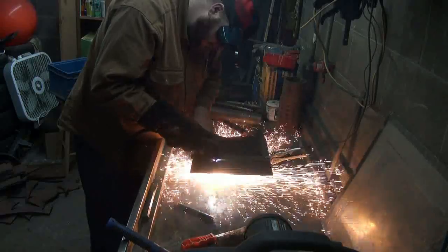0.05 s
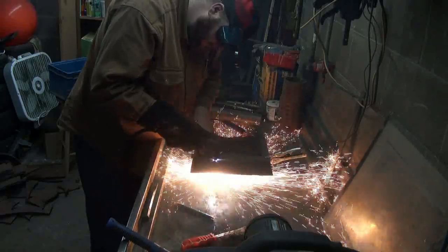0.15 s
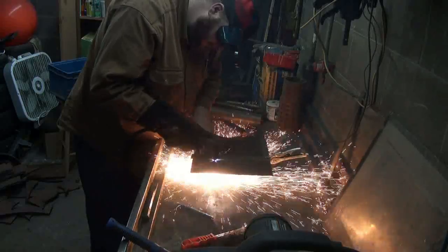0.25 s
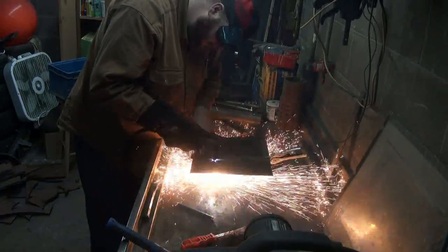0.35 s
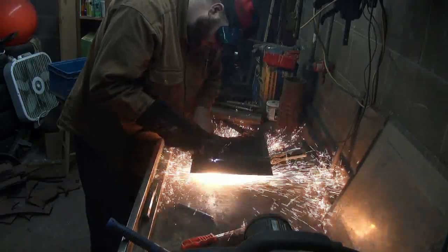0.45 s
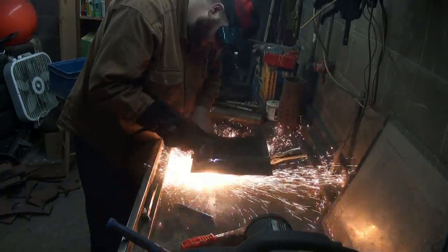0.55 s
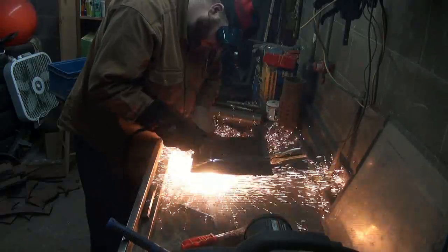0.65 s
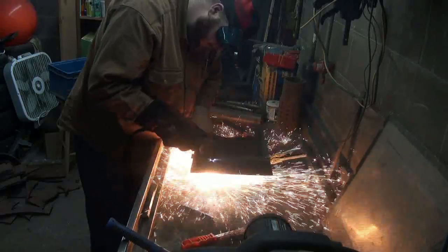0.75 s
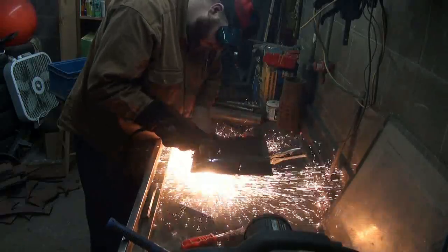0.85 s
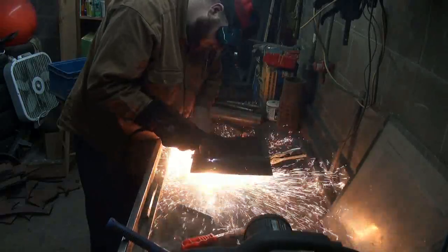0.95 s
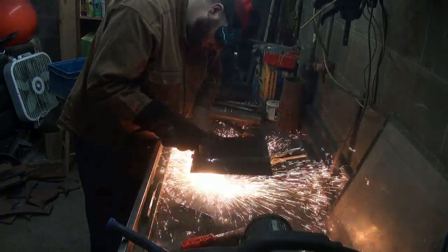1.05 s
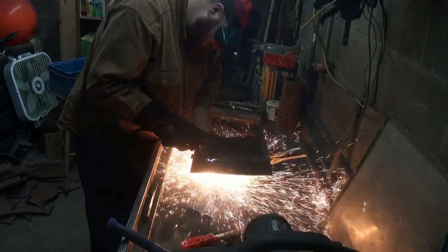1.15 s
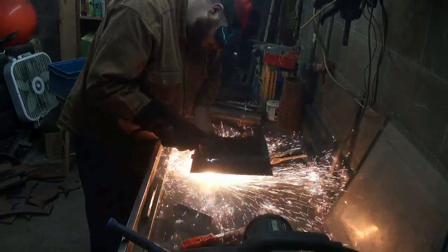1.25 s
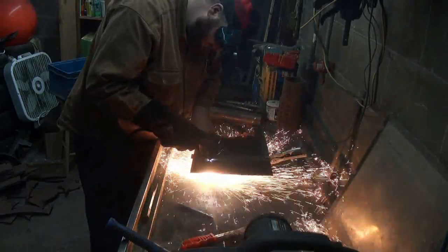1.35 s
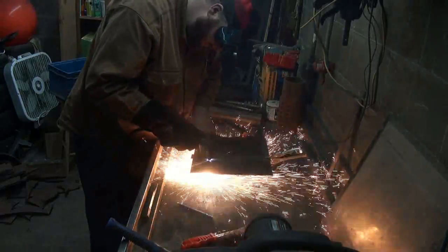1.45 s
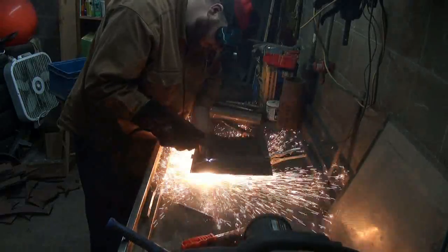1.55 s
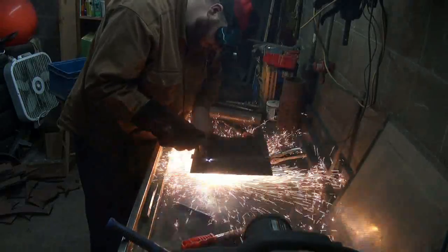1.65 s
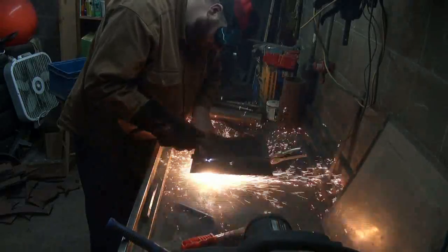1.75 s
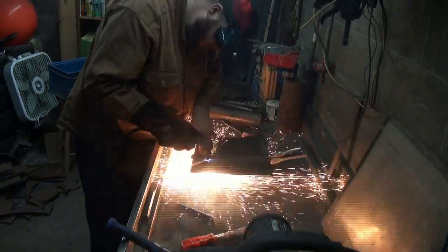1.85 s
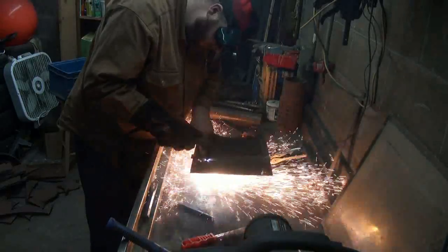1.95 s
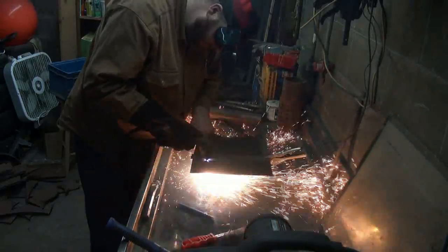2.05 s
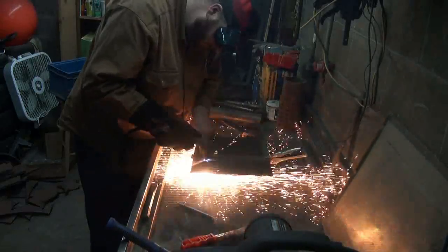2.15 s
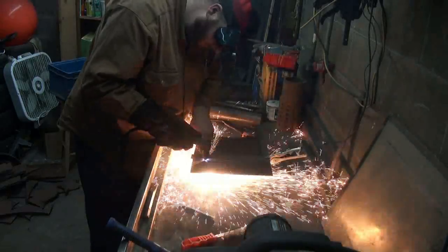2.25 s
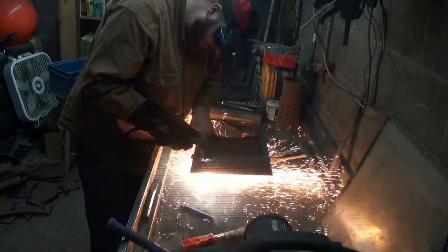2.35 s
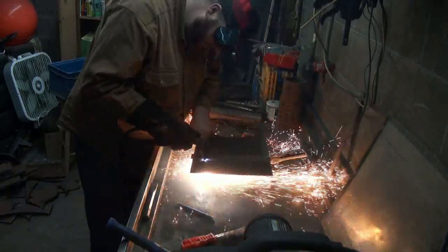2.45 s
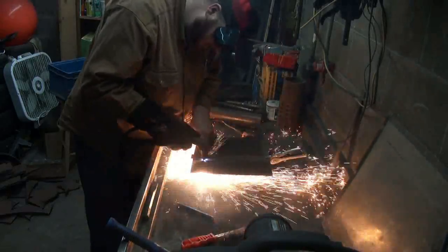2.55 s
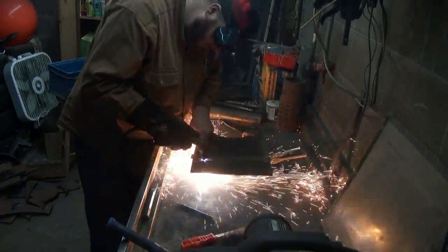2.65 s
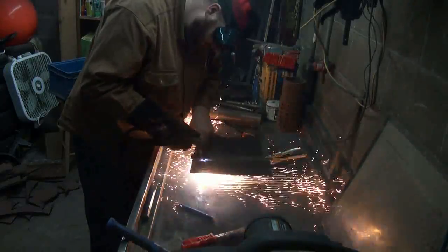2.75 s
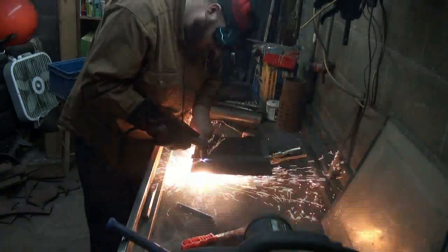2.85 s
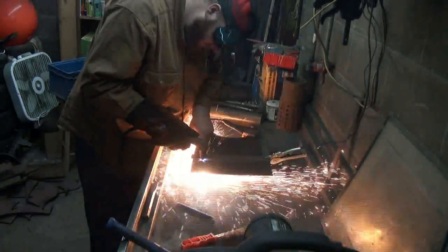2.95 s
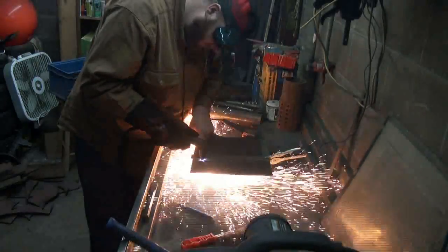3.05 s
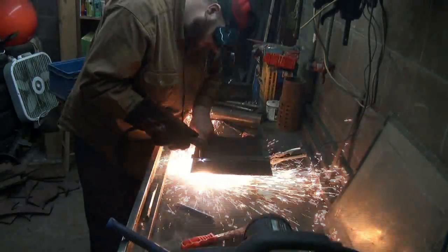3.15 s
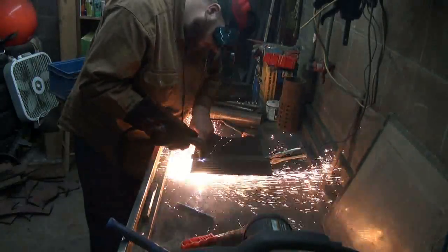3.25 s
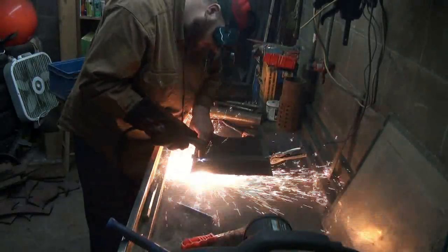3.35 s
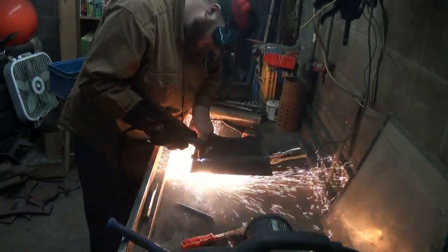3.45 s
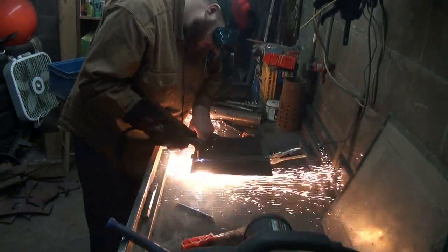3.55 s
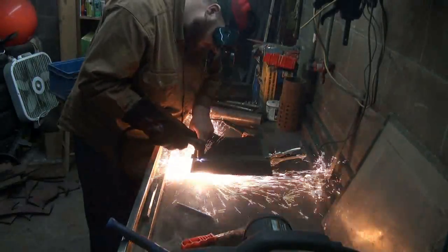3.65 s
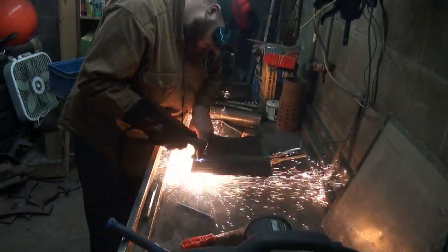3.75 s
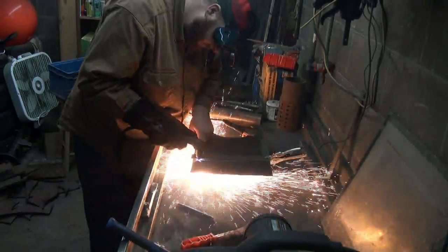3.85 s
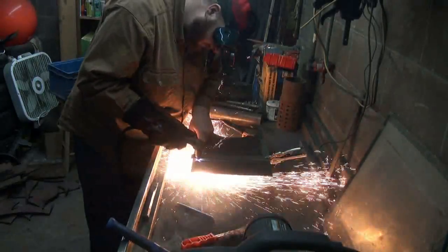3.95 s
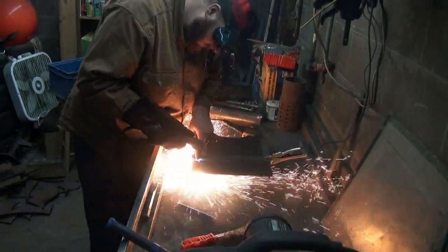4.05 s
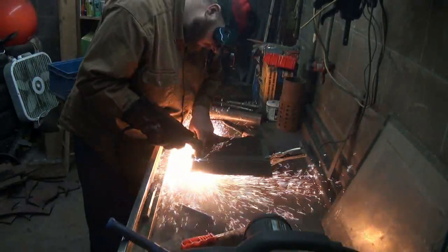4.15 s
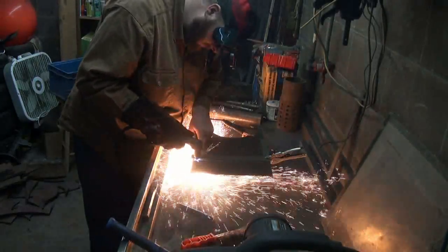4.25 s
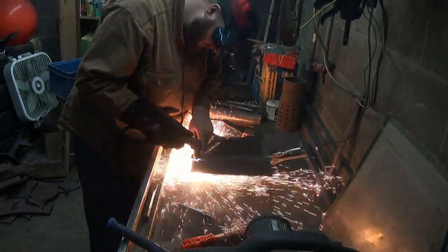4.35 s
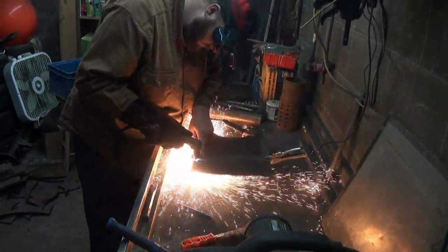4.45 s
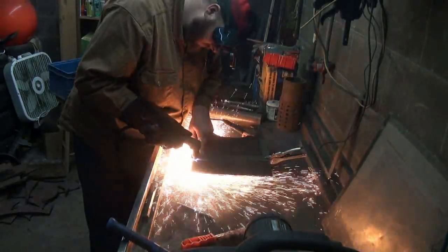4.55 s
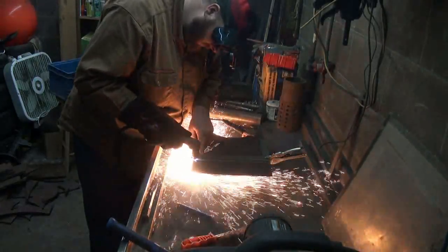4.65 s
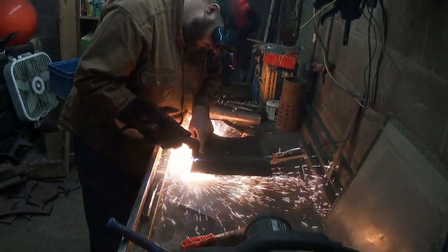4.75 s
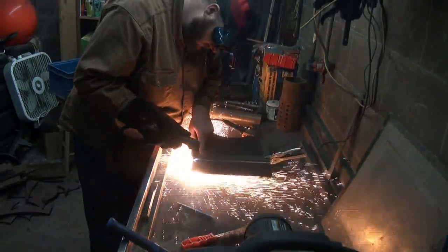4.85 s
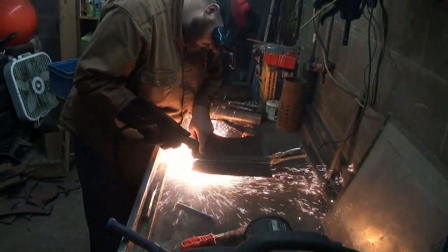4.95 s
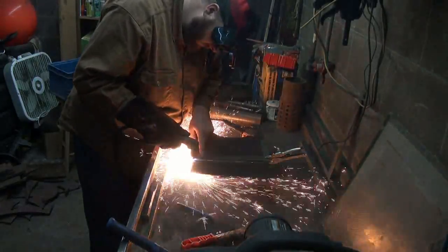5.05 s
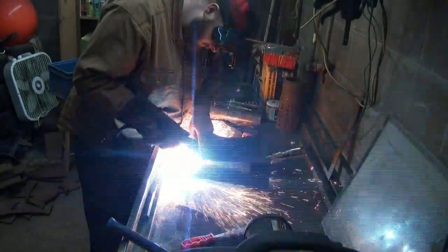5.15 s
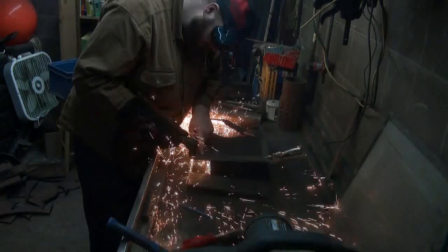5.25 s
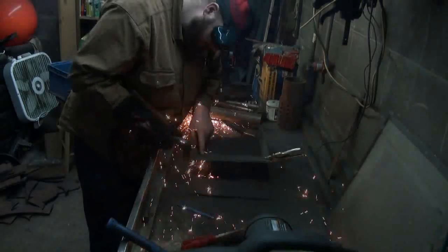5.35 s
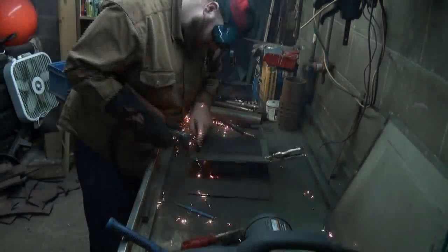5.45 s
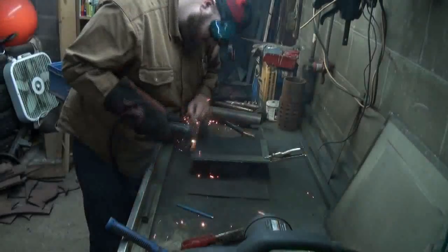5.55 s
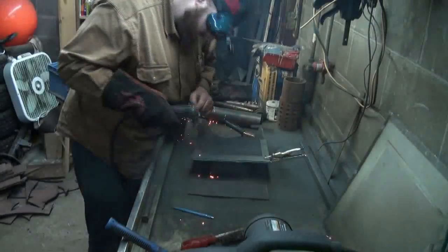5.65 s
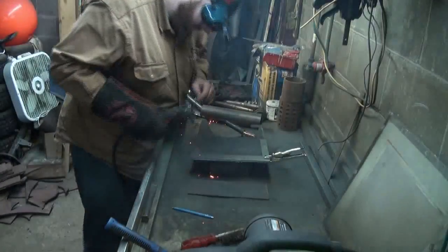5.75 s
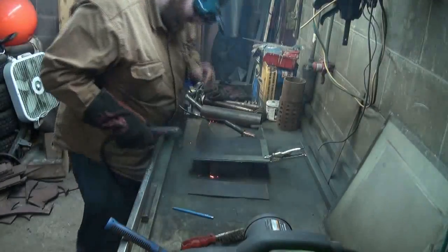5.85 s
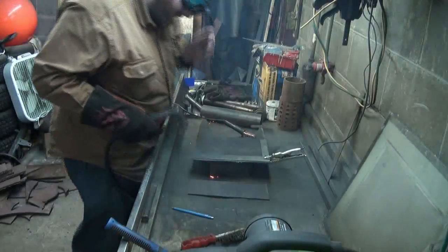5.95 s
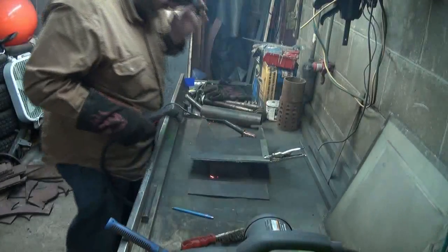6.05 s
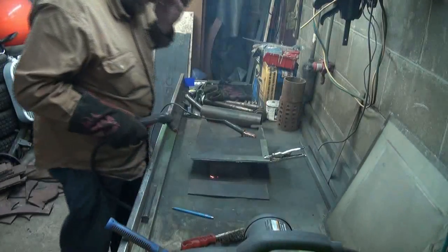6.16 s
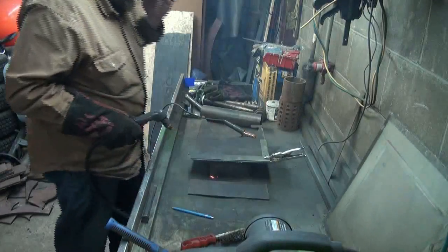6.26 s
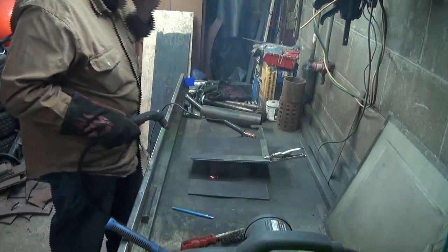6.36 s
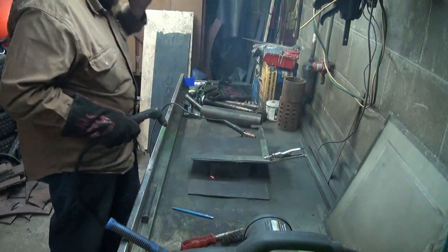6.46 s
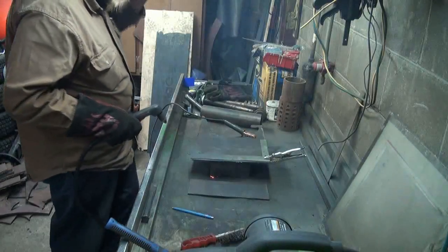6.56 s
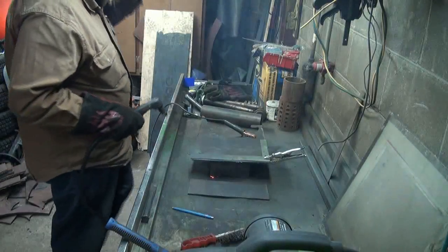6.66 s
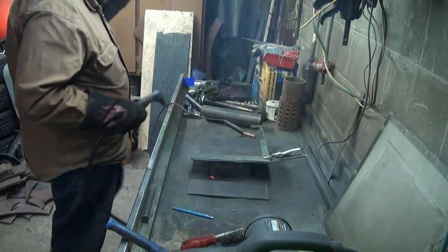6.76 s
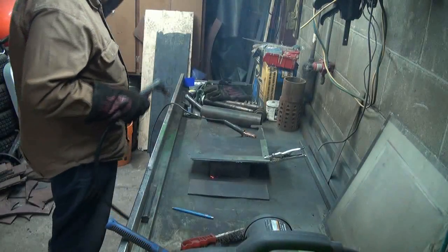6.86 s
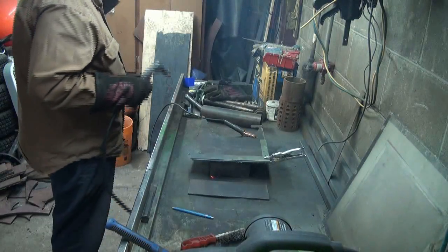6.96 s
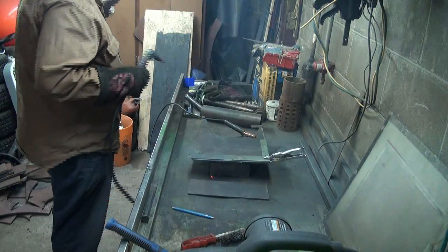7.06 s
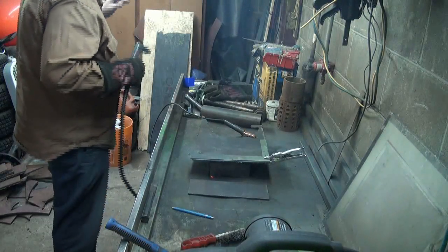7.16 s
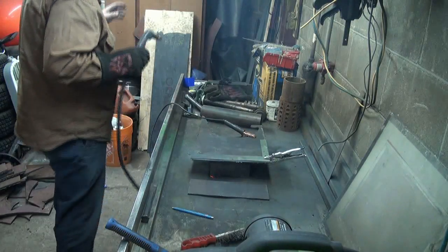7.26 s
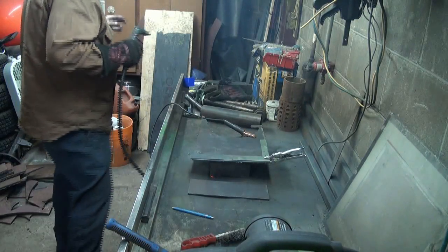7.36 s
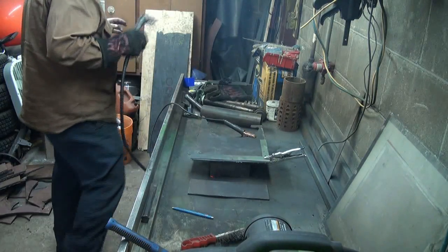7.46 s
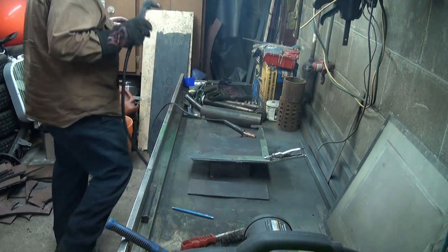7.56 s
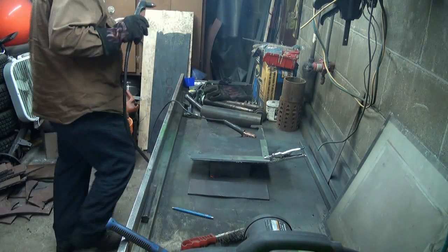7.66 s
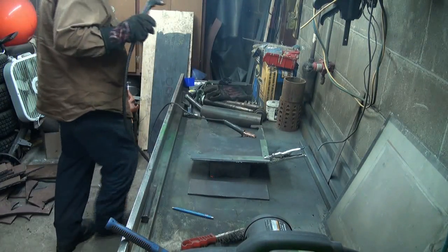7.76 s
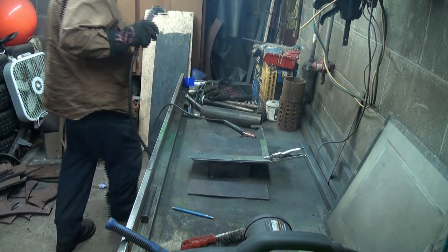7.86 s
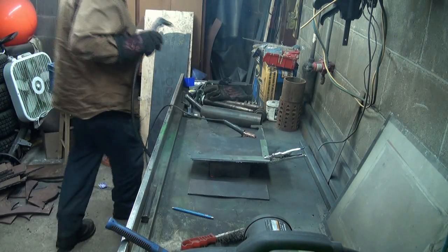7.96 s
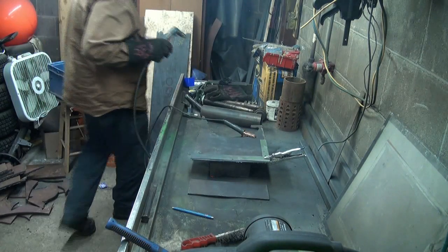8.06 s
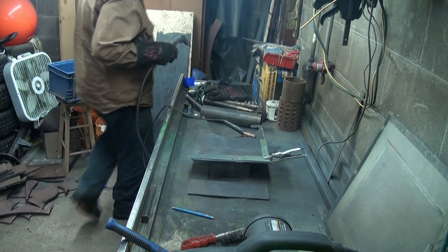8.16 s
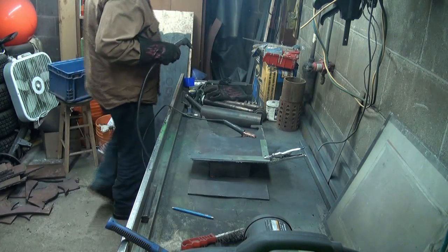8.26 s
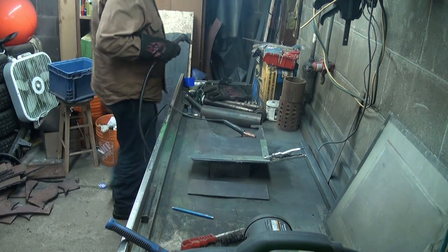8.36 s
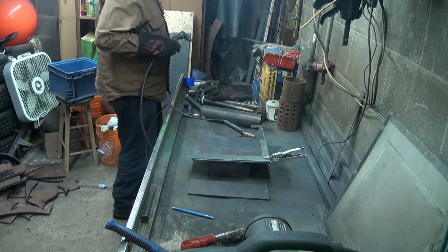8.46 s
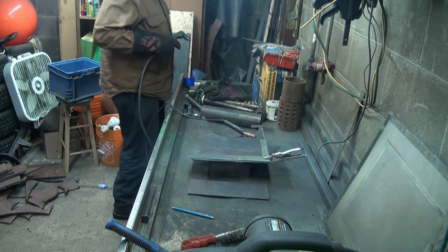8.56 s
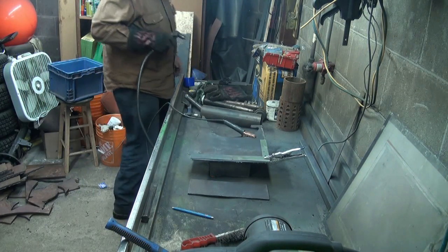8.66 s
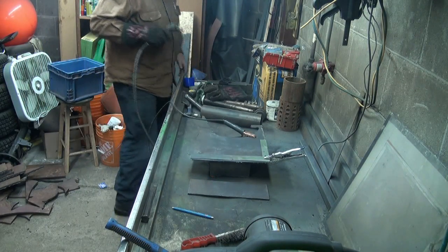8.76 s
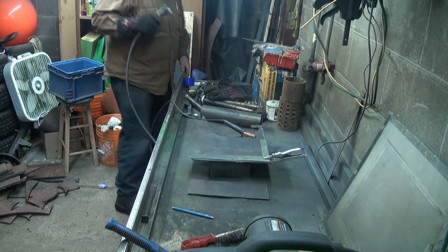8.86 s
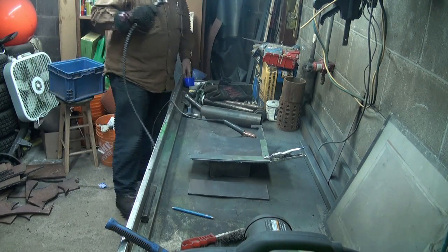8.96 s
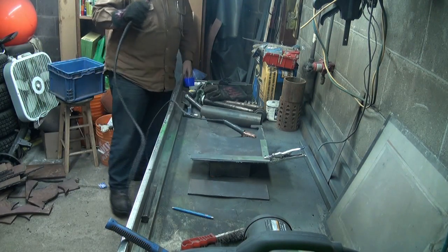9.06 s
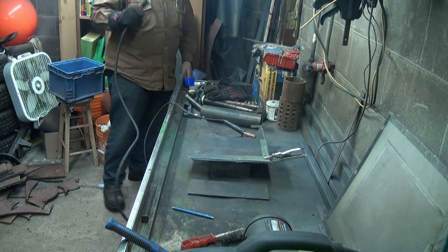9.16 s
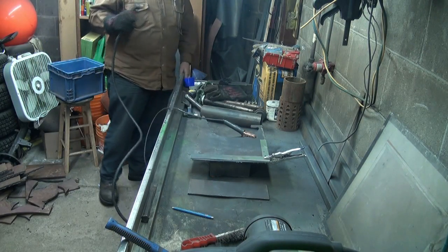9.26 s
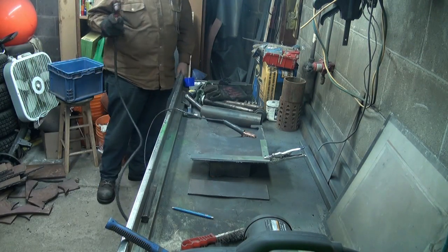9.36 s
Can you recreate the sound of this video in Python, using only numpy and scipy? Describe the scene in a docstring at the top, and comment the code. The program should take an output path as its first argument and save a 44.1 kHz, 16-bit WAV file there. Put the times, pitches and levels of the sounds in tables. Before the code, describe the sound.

Close by in a small workshop, a plasma cutter hisses harshly through steel plate, with flaring roars and brief spits of slag. A little past halfway the cutting stops and the offcut drops, clattering on a sheet-steel bench. Softer air keeps hissing from the nozzle, while a fan motor hums to the right and a loose part ticks faintly and quickly.

```python
"""Plasma cutting in a small workshop

Close to a sheet-steel bench, on a camera's stereo microphone. A hand-held torch's turbulent jet hisses
and roars in the kerf, ringing the steel plate and spitting slag, until the offcut drops and clatters;
cooling air then keeps blowing from the nozzle. Behind, to the right, a motor and its fan hum and a
loose part ticks. The camera's gain control holds the hiss down and slowly lets the room come back up."""
import sys
import numpy as np
from scipy import signal
from scipy.fft import rfft, irfft, next_fast_len
from scipy.io import wavfile
from scipy.ndimage import uniform_filter1d

SR = 44100
rng = np.random.default_rng(int(sys.argv[2]) if len(sys.argv) > 2 else 0)


def put_to_file(sound):
    """Save the sound as 16-bit audio at rate SR, in the file named by the first command-line argument."""
    columns = np.atleast_2d(sound).T  # one column per channel
    safe = np.clip(columns, -1, 1)
    whole_steps = np.round(safe * 32767)
    wavfile.write(sys.argv[1], SR, whole_steps.astype(np.int16))


N = 414540
T = np.arange(N) / SR
FFT_SIZE = next_fast_len(N)
HZ = np.maximum(np.fft.rfftfreq(FFT_SIZE, 1 / SR), 1)
ARC_OUT_S, SHAFT_HZ = 5.372, 28.46


# The hand turns the torch before the microphone: time_s, nozzle_hz, upper_kerf_db, left_minus_right_db
TORCH_AIM = [(0, 10700, -2, -2), (.5, 10200, -9, -1.5), (1, 11100, -9, -2), (1.5, 10600, -1.5, -2.5),
             (2.5, 11200, -2, -1.5), (3.6, 11900, 0, -1.5), (4.4, 11600, 8, -1.5), (5.3, 12100, -4, -1.5),
             (6.2, 12700, -3, -3.5), (7.6, 11600, 5, -1), (8.5, 11900, -9, -1.5), (9.4, 11500, -3, -1)]
# Centres of the jet's roar, spit, hiss and treble bands: centre_hz
JET_BANDS = [700, 2600, 6400, 10000]

def torch(crackle_db=0.73):
    """Turbulent jet noise whose bands and resonances follow the hand; it crackles while the arc cuts."""
    framing = dict(fs=SR, nperseg=1024, noverlap=768)
    hz, t, frames = signal.stft(jet_noise(), **framing)
    hz = np.maximum(hz, 1)[:, None]
    nozzle_hz, upper_kerf_db, pan_db = over_time(TORCH_AIM, t)
    hiss_db, roar_db, spit_db, treble_db = jet_levels(t)
    roar, spit, _, treble = (np.interp(np.log(hz), np.log(JET_BANDS), row) for row in np.eye(4))
    treble = treble * np.interp(hz, [12500, 15500], [1, 0.6])  # less lift at the very top
    db = hiss_db + roar * roar_db + spit * spit_db + treble * treble_db
    db = db + eddies(t, roar, treble)
    ring = resonances(hz, t, nozzle_hz, upper_kerf_db)
    lean_db = pan_db * np.interp(hz, [11200, 11800], [1.2, 0.6])  # the top sits nearer the centre
    frames = frames * undb(db + np.array([lean_db, -lean_db]) / 2) * ring
    jet = undb(3.5) * signal.istft(frames, **framing)[1][:, :N]
    return jet * undb(crackle_db * wander(250) * (T < ARC_OUT_S))


# The jet's spectrum close up: frequency_hz, density_db
JET_SPECTRUM = [(60, -12), (250, -6), (700, 4), (1300, -3), (2300, -4.5), (3000, -2), (5000, -1.5),
                (8300, -1.5), (11300, -2), (13500, -4), (15700, -6.5)]
# Arc, then air alone, at the microphone: frequency_hz, likeness, right_lead_rad, left_minus_right_db
ARC_IMAGE = [(60, 0.9, 0, 0), (250, 0.65, 0, -1), (600, 0.9, .2, 0), (1400, 0.75, 0, -1), (2820, 1, 0, 0),
             (4800, 0.78, 0.15, -0.5), (7000, 0.8, .3, -2), (8400, 0.22, 0.15, -2), (9800, 0.55, -0.54, -2),
             (11600, 0.58, -0.33, -0.5), (12100, 0.92, .3, -1), (15500, 0.87, .2, 0)]
AIR_IMAGE = [(60, .95, 0, 0), (3000, 0.71, 0, 0), (6200, 0.75, .2, 1), (8300, .47, .3, 0.081),
             (11200, 0.42, -.2, 0), (11800, .92, .15, 0), (15500, 1, 0, 0)]

def jet_noise():
    """Gas rushes from the nozzle; its stereo image changes as the arc goes out."""
    arc = placed_noise(JET_SPECTRUM, ARC_IMAGE)
    air = placed_noise(JET_SPECTRUM, AIR_IMAGE)
    return np.where(T < ARC_OUT_S, arc, air)


# The arc in the kerf: time_s, hiss_db, spit_over_hiss_db, treble_over_hiss_db
CUTTING = [(0, -4.5, -6.5, 3), (.55, -6, -6, 5.5), (.85, -4.5, -8, 2.5), (1.2, -6, -6, 7),
           (1.7, -4, -7.5, 4.5), (2.15, -5, -6, 2), (2.8, -4.5, -5, 3.5), (3.3, -5, -6, 4.5),
           (3.7, -5.5, -4.5, 1.5), (4.2, -5, -4.5, 3), (4.5, -5, -4, 4.5), (5.25, -6.5, -7, 2.5),
           (5.36, -6, -5, 0.5)]
# The jet bites and the roar flares, or once sags: peak_s, length_s, lift_db
ROAR_FLARES = [(0.243, 0.31, 9), (.69, 0.085, 5.5), (0.857, 0.098, 3.5), (1.035, .15, 6), (1.417, 0.21, 9),
               (1.655, 0.16, 6), (1.966, 0.16, 10), (2.382, 0.2, 11.5), (2.723, 0.07, 8), (2.83, 0.11, -11),
               (3.017, 0.15, 9.5), (3.362, 0.2, 7), (3.67, 0.32, 5.5), (4.03, 0.12, 6), (4.252, 0.29, 6),
               (4.705, 0.27, 8.5), (5.116, 0.36, 5.5)]
# Cooling air alone, carried about in the hand: time_s, hiss_db
COOLING_AIR = [(5.4, -18), (5.5, -22.5), (5.64, -18), (6.44, -19), (6.8, -22), (7.5, -21.5), (8.3, -22.5),
               (8.84, -23.5), (8.92, -20.5), (9.4, -20)]

def jet_levels(t):
    """Hiss level, then roar, spit and treble against it, in dB: the flaring arc, then air alone."""
    hiss_db, spit_db, treble_db = over_time(CUTTING, t)
    flare_db = sum(db * np.exp(-(2 * (t - s) / length) ** 2) for s, length, db in ROAR_FLARES)
    arc = [hiss_db, -21 + flare_db, spit_db + 0.24 * flare_db, treble_db - 0.11 * flare_db]
    air = [over_time(COOLING_AIR, t)[0], -30, -7.5, 1.5]
    return [np.where(t < ARC_OUT_S, arc_db, air_db) for arc_db, air_db in zip(arc, air)]


def eddies(t, roar, treble):
    """Eddies come and go, in dB: the roar flutters most, the treble breaks into brief whistles."""
    shape = (len(roar), len(t))
    flutter = (0.28 + roar) * patches((1, len(t)), size=(1, 8))
    whistles = (0.38 + 0.43 * treble) * patches(shape, size=(3, 90))
    broad_eddies = 0.4 * patches(shape, size=(30, 8))
    # the fine colour shifts in spurts, more so with molten slag in the cut
    spurts = np.where(t < ARC_OUT_S, 2.2, 1.3) * patches(shape, size=(3, 16))
    return flutter + whistles + broad_eddies + spurts


# Plate and bench modes, strongest as the arc passes their spot: pitch_hz, width_hz, level_db, passed_s
PLATE_MODES = [(1027, 115, 4, 1.5), (1494, 46, 7.5, 2.5), (1770, 184, 5.5, 3.1), (2095, 82, 4, 0.9),
               (2590, 110, 1.5, 1.5), (2864, 160, 2, 3.5), (3300, 59, 6, .3), (3230, 66, -5.5, 3.5),
               (3700, 99, 3, 6), (4080, 210, -4.5, 3.1), (7700, 140, -15, 2)]

def resonances(hz, t, nozzle_hz, upper_kerf_db, passing_s=3.92, kerf_fade_s=0.6):
    """Gain on the jet: the nozzle resonates throughout, plate and kerf only while the arc cuts."""
    modes = sum(undb(db) * resonance(hz, pitch_hz, width_hz) * resonance(t, passed_s, passing_s)
                for pitch_hz, width_hz, db, passed_s in PLATE_MODES)
    plate = modes * undb(0.79 * patches(modes.shape, size=(12, 80)))
    kerf_hz = 6090 - 117 * t  # sinks as the cut lengthens
    lower = 0.89 * resonance(hz, kerf_hz, width=240)
    upper = 0.61 * undb(upper_kerf_db) * resonance(hz, 1.16 * kerf_hz, width=290)
    kerf = (lower + upper) * np.clip((ARC_OUT_S - t) / kerf_fade_s, 0, 1)  # fades near the plate's edge
    nozzle = 0.65 * resonance(hz, nozzle_hz, width=2350)
    return 1 + (t < ARC_OUT_S) * (1.1 * plate + kerf) + nozzle


# Slag blows out of the kerf: start_s, relative_level_db
SLAG_SPITS = [(0.26, -25), (1.986, -15), (2.214, -16.5), (2.375, -14.5), (2.597, -11), (2.869, -16),
              (3.655, -22), (3.924, -18), (5.068, -22)]

def slag():
    """Short puffs of mid-range noise as slag lets go."""
    puffs = sum(undb(db) * (T > s) * decay(np.clip(T - s, 0, 1), t60_s=0.14) for s, db in SLAG_SPITS)
    colour = undb(over_hz([(300, -10), (900, -1), (2000, 0), (5000, -22)]))
    return puffs * at_rms(stereo_noise(colour, likeness=0.83), 4.1)


# The offcut lands and rattles, just right of centre: start_s, level_db, brightness_db
LANDINGS = [(5.317, -5, 2), (5.333, -6, 0), (5.344, -0.5, -12), (5.362, -2.5, -7), (5.387, -6, -4),
            (5.403, -15, -2.5), (5.439, -12, 0), (5.481, 2, -0.5), (5.508, -1, -16), (5.552, -3.5, -11),
            (5.597, -9.5, -11)]
# Modes of the cut piece: pitch_hz, level_db, t60_s
OFFCUT_MODES = [(276, -3, 0.18), (2220, -25, 0.27), (3500, -5, 0.087), (5400, -7, .1), (6200, -7, 0.13),
                (7000, -10, 0.18), (7900, -7, .15)]
# The struck sheet-steel bench: frequency_hz, density_db
BENCH_SPECTRUM = [(40, -36), (95, -2.5), (250, 1), (550, 2), (750, 1), (2000, -3.5), (6000, -7.5),
                  (15000, -20)]

def offcut():
    """Each landing shakes the sheet bench into a burst of noise and rings the cut piece."""
    likeness = over_hz([(120, 0.9), (400, 0.49), (3000, 0.62)])
    crash = at_rms(stereo_noise(undb(over_hz(BENCH_SPECTRUM)), likeness), 0)
    boom = signal.sosfilt(signal.butter(1, 1500, fs=SR, output="sos"), crash)
    clash = crash - boom
    out, t = np.zeros((2, N)), T[:SR // 2]
    for start_s, level_db, brightness_db in LANDINGS:
        span = slice(int(start_s * SR), int(start_s * SR) + len(t))
        bench = boom[:, span] + undb(brightness_db) * clash[:, span]
        bench = bench * attack(t, 0.0043) * decay(t, t60_s=0.25)
        scatter = rng.uniform(-np.pi, np.pi, (len(OFFCUT_MODES), 2))
        ring = sum(undb(db + offset_db) * np.sin(2 * np.pi * hz * t + phase) * decay(t, t60_s)
                   for (hz, db, t60_s), (offset_db, phase) in zip(OFFCUT_MODES, scatter))
        out[:, span] += undb(level_db) * (bench + undb(-5.5) * ring * attack(t, 0.0033))
    return out * pan(-1.7)


# Tones of the three-bladed fan behind the bench: shaft_multiple, relative_level_db
BLADE_TONES = [(1.5, -64), (3, -45), (6, -44.5), (9, -39.5), (12, -45.5), (18, -45), (21, -46), (30, -52.5),
               (36, -49)]
# The motor's mains hum and its beats: pitch_hz, relative_level_db
HUM_TONES = [(118, -46), (206.2, -49.5), (292, -47), (266.4, -45), (436, -48.5), (467, -50.5)]
# The fan's rush of air: frequency_hz, density_db
FAN_SPECTRUM = [(30, -17), (55, -26), (100, -7.5), (140, -17.5), (230, -11), (370, -8.5), (500, -4.5),
                (560, -11), (680, -6), (900, -10.5), (2000, -13), (4000, -17.5), (9000, -36)]
# That air at the microphone, from the right: frequency_hz, likeness, right_lead_rad, left_minus_right_db
FAN_IMAGE = [(30, .3, 0, -2), (70, 0.87, 0.11, 0), (250, 0.67, -0.14, -4.5), (500, .7, -0.17, -6.5),
             (900, .65, -2.1, -8.5), (1400, 0.58, -1.6, -9), (2600, 0.27, -.8, -6.5), (6000, .2, 0.3, -7)]

def motor():
    """Blade tones and mains hum waver over the fan's air noise."""
    shaft_angle = 2 * np.pi * np.cumsum(SHAFT_HZ * (1 + 0.000976 * wander(2.015))) / SR
    lead = np.array([[-0.02], [0.02]])  # the blades reach the microphone's right side first
    blades = sum(undb(db + wander(5)) * np.sin(k * (shaft_angle + k + lead)) for k, db in BLADE_TONES)
    hum = sum(undb(db + 2 * wander(6.9)) * np.sin(2 * np.pi * hz * T) for hz, db in HUM_TONES)
    air = at_rms(placed_noise(FAN_SPECTRUM, FAN_IMAGE), -25)
    blade_push = 1 + 0.046 * np.sin(3 * shaft_angle)
    air = air * blade_push * undb(1.36 * wander(4.6))
    return undb(7) * (blades + hum) * pan(-2.5) + air


def loose_part(anchor_s=6.517, turns_per_tick=4.62):
    """A loose part ticks on whole shaft turns, about six times a second, off to the right."""
    turns = np.floor(np.arange(-40, 18) * turns_per_tick + 0.78)
    ticks, t = np.zeros(N), T[:SR // 20]
    for start_s in anchor_s + turns / SHAFT_HZ:
        tick = rng.standard_normal(len(t)) * attack(t, 0.0021) * decay(t, t60_s=0.16)
        ticks[int(start_s * SR):][:len(t)] += tick
    colour = undb(over_hz([(300, -4), (1000, 4.5), (3500, 3.5), (8000, -12), (15000, -20)]))
    return undb(-21) * irfft(rfft(ticks, FFT_SIZE) * colour, FFT_SIZE)[:N] * pan(-12.5)


def workshop(direct, t60_s=0.28, wet_db=-12):
    """A short diffuse tail off block walls and shelves, strongest in the middle range."""
    t = T[:SR // 2]
    tail = rng.standard_normal((2, len(t))) * decay(t, t60_s) * (t > 0.006)
    tail = signal.sosfilt(signal.butter(2, [400, 8000], "bandpass", fs=SR, output="sos"), tail)
    tail = tail / np.sqrt(np.sum(tail ** 2, axis=1, keepdims=True))
    return direct + undb(wet_db) * signal.fftconvolve(direct, tail, axes=1)[:, :N]


def placed_noise(spectrum, image):
    """Noise of a given spectrum as the microphone's two sides hear it."""
    hz, *columns = np.transpose(image)
    likeness, lead_rad, balance_db = (np.interp(np.log(HZ), np.log(hz), c) for c in columns)
    return stereo_noise(undb(over_hz(spectrum)), likeness, balance_db, lead_rad)


def stereo_noise(colour, likeness, balance_db=0.0, lead_rad=0.0):
    """Left and right noise of one colour, unrelated at likeness 0 and alike at 1."""
    mid, side = rfft(rng.standard_normal((2, FFT_SIZE)))
    likeness, sign = np.clip(likeness, -1, 1), np.array([[1], [-1]])
    pair = np.sqrt(1 + likeness) * mid + np.sqrt(1 - likeness) * side * sign
    pair = pair * np.exp(-0.5j * lead_rad * sign)
    return irfft(colour * pair * pan(balance_db), FFT_SIZE)[:, :N]


def wander(rate_hz):
    """Random steps, smoothed twice; spread near 1."""
    hold = int(SR / rate_hz)
    steps = np.repeat(rng.standard_normal(N // hold + 3), hold)
    return 1.293 * uniform_filter1d(uniform_filter1d(steps, hold), hold)[hold:N + hold]


def patches(shape, size):
    """Random hills over frequency and time, size in bins by frames; spread 1."""
    hills = rng.standard_normal(shape)
    for axis in (0, 0, 1, 1):
        hills = uniform_filter1d(hills, size[axis], axis=axis)
    return hills / hills.std()


def resonance(x, centre, width):
    """A bell-shaped curve, 1 at the centre, with its width taken at half height."""
    return 1 / (1 + (2 * (x - centre) / width) ** 2)


def over_hz(table):
    """A (frequency_hz, value) table read at every frequency bin."""
    hz, value = np.transpose(table)
    return np.interp(np.log(HZ), np.log(hz), value)


def over_time(table, t):
    """The value columns of a (time_s, values...) table read at times t."""
    time_s, *columns = np.transpose(table)
    return [np.interp(t, time_s, c) for c in columns]


def attack(t, rise_s):
    """Exponential rise towards 1."""
    return 1 - np.exp(-t / rise_s)


def decay(t, t60_s):
    """Fall of 60 dB every t60_s."""
    return undb(-60 * t / t60_s)


def pan(left_minus_right_db):
    """Left and right gains."""
    return undb(np.array([left_minus_right_db, -left_minus_right_db]).reshape(2, -1) / 2)


def at_rms(x, db):
    """Scale to an rms level."""
    return x * undb(db) / np.sqrt(np.mean(x ** 2))


def undb(db):
    """dB to gain."""
    return 10 ** (np.asarray(db) / 20)


def scene():
    """Torch, slag, offcut and ticks ring in the room over the motor."""
    return workshop(torch() + slag() + offcut() + loose_part()) + motor()


def record(dry, threshold_db=-13.0, rise_db_per_s=3.5, window_s=0.55):
    """The camera's gain drops fast and climbs back slowly; peaks round off, rumble and top are cut."""
    power = uniform_filter1d(np.mean(dry ** 2, axis=0), int(window_s * SR), mode="reflect")
    allowed_db = np.minimum(threshold_db - 10 * np.log10(power), 0)
    gain_db = np.minimum.accumulate(allowed_db - rise_db_per_s * T) + rise_db_per_s * T
    held = dry * undb(uniform_filter1d(gain_db, SR // 20))
    rounded = np.tanh(0.68 * held) / 0.72
    low_cut = signal.butter(2, 35, "highpass", fs=SR, output="sos")
    high_cut = signal.ellip(12, 0.2, 80, 15720, fs=SR, output="sos")
    return signal.sosfilt(high_cut, signal.sosfilt(low_cut, rounded))


dry = scene()
out = record(dry)
put_to_file(out)
```